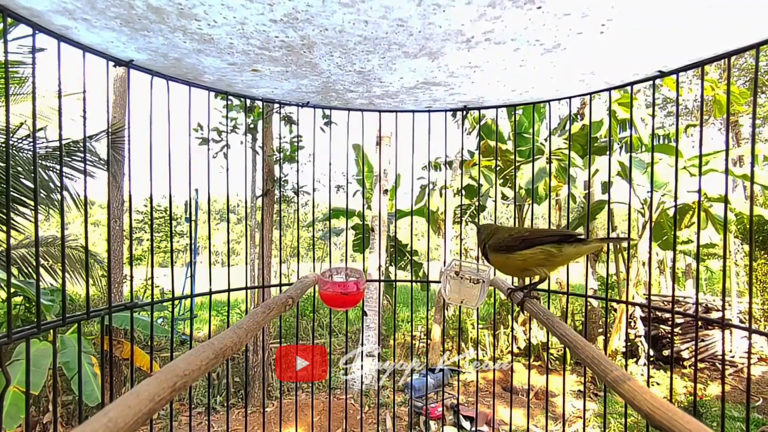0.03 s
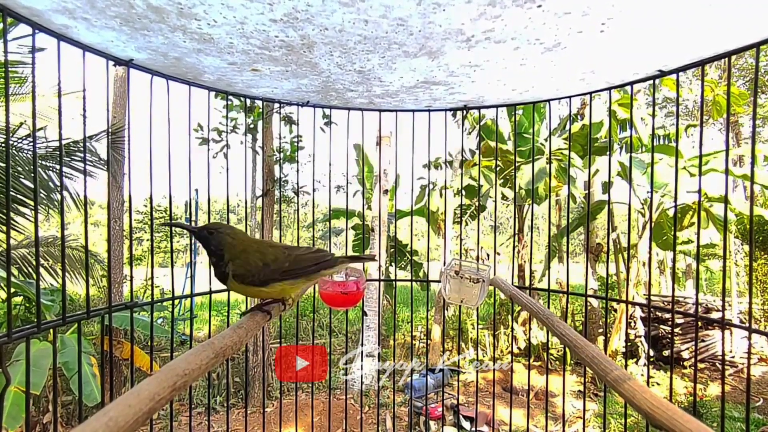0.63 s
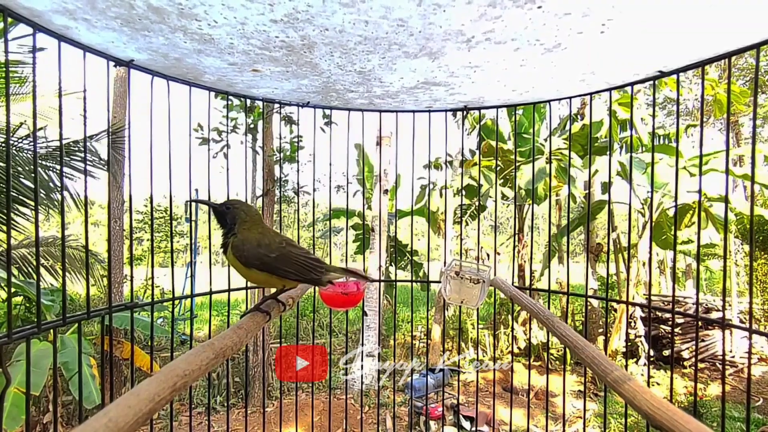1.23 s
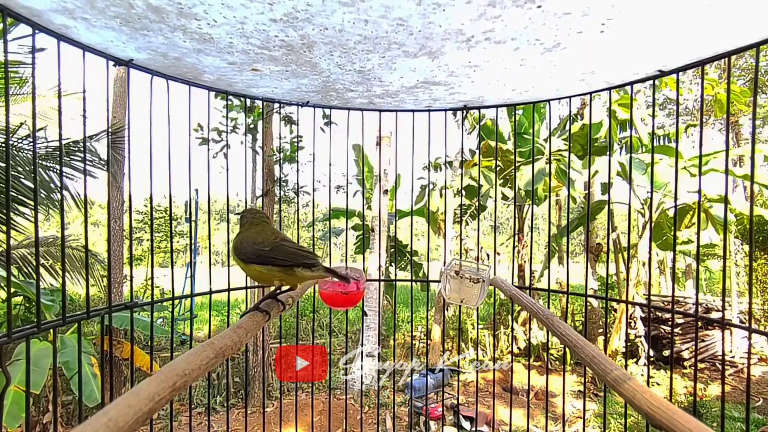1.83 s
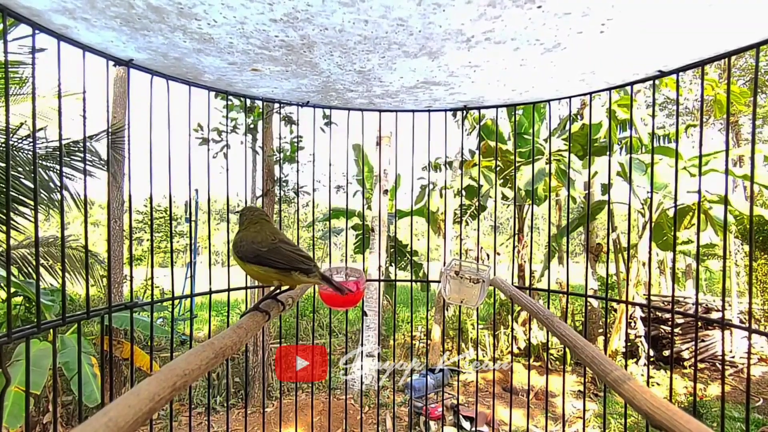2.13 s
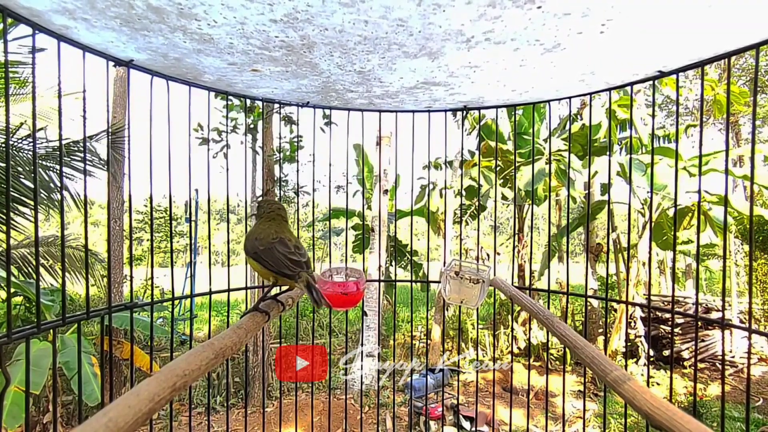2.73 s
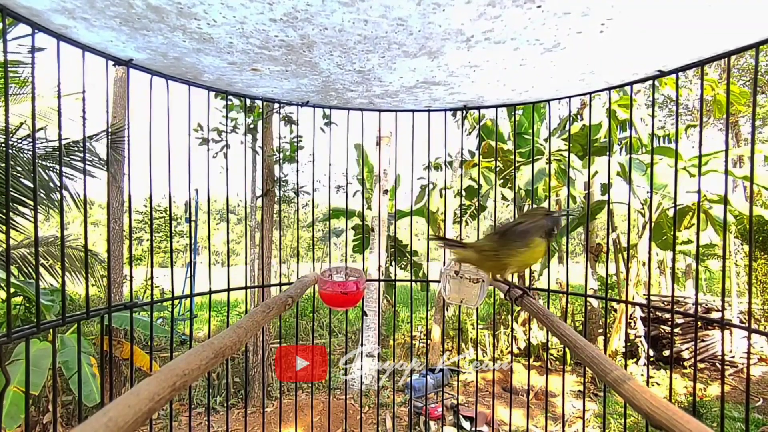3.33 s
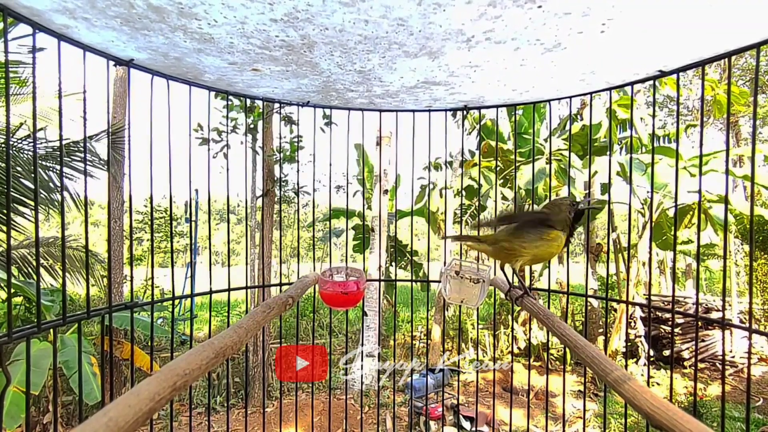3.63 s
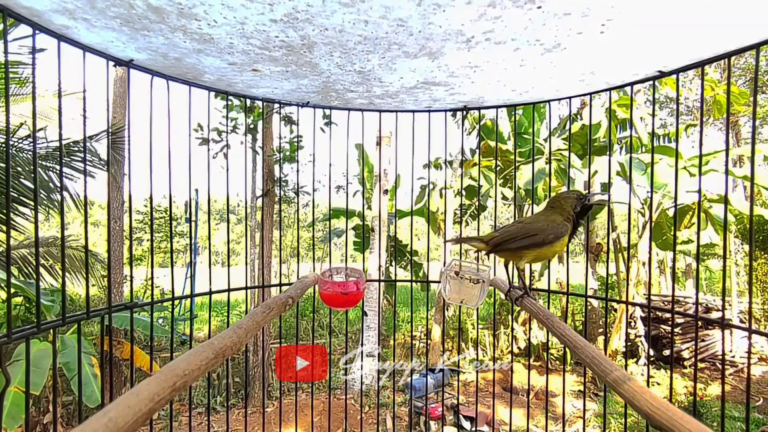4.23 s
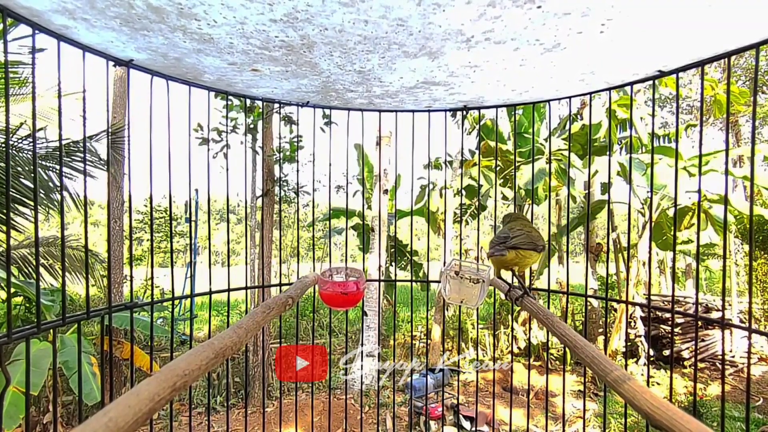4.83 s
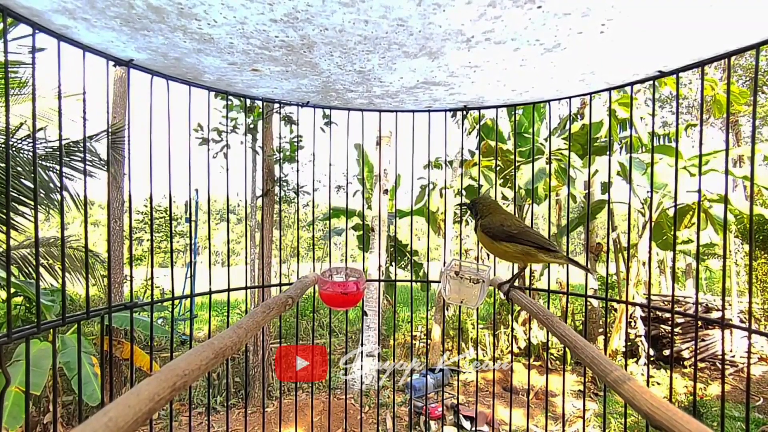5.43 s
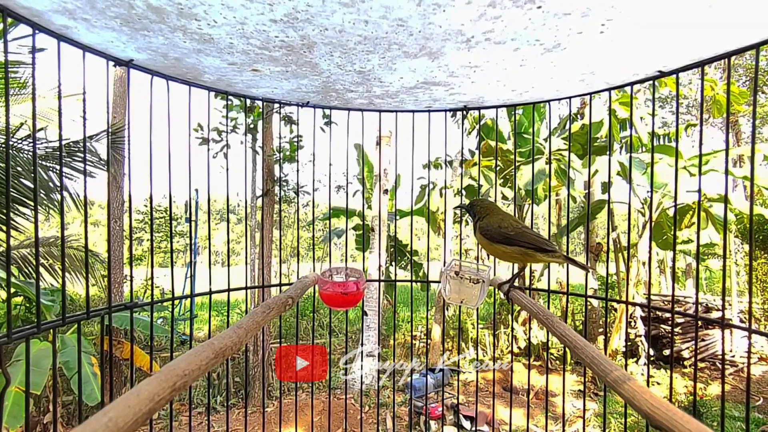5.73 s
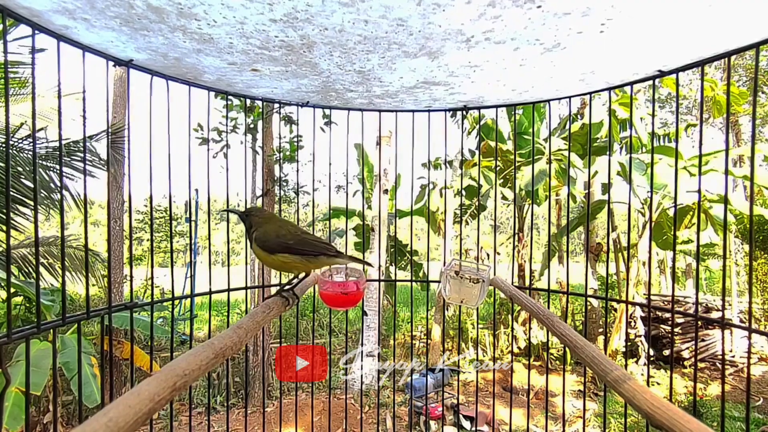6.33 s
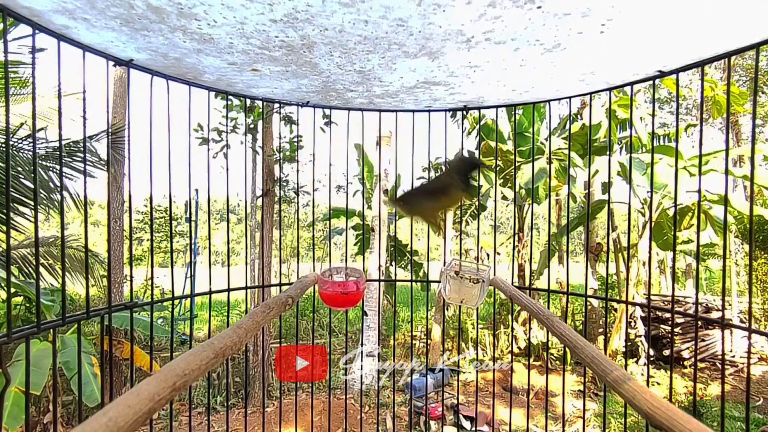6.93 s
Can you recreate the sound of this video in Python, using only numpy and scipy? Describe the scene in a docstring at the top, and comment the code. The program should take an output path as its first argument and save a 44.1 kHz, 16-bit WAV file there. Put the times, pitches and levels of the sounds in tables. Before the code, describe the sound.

A small caged bird calls loudly, close to the microphone, in a quiet garden. A sharp high chip comes at 0.2 seconds, with soft wing flutters and two light, ringing cage taps around 0.5. From 0.8 to 1.1 it holds one nasal note, hoarse at the edges. Two quick chips at 2.5 lead into nine arching notes from 2.7 to 4.3, about five a second, each climbing from a rasp into a whistle and closing nasally; the last is cut short. A faint flutter passes at 3.3. More soft flutters and taps come near 6.2 and 6.8, with a final sharp chip at 6.7 and a tap at 7. Another bird calls very faintly in the distance around 1.8, 5 and 6 seconds. Throughout, a far motor hums and throbs quietly beneath a thin insect whine and soft outdoor hiss.

```python
"""A garden, close to a caged sunbird: sharp chips, one long nasal note, then nine arched notes.
Membranes in its syrinx beat to make a harmonic series, which two throat resonances filter, so that
each arched note climbs out of a rasp into a clear whistle. As the bird hops between perches its wings
flutter and its feet set the cage ringing. Behind it a far motor hums and throbs, insects whine and
another bird calls faintly over a soft murmur."""
import sys
import numpy as np
from scipy import signal
from scipy.fft import rfft, irfft, next_fast_len
from scipy.io import wavfile
from scipy.ndimage import uniform_filter1d, minimum_filter1d, map_coordinates

SR = 44100
rng = np.random.default_rng(int(sys.argv[2]) if len(sys.argv) > 2 else 0)


def wav_out(sig):
    """Save sig, one row per channel (or a flat mono array), as 16-bit PCM at SR to the path in sys.argv[1]."""
    wavfile.write(sys.argv[1], SR, np.round(np.clip(np.atleast_2d(sig).T, -1, 1) * 32767).astype(np.int16))


N = 312228
TOP_HZ = 15900  # upper band limit

# Likeness of the garden's noise at the two ears. Each row: frequency in Hz, correlation from -1 to 1.
EAR_CORRELATION = [(60, 0.43), (130, 0.89), (290, 0.48), (640, -0.35), (1410, -0.11), (3100, -0.56),
                   (6820, 0.62), (15000, 0.19)]
# Pitch of the insect whine. Each row: time in seconds, pitch in Hz.
WHINE_PITCH = [(0, 3496), (.9, 3497), (1.55, 3471), (2.4, 3500), (4.5, 3503), (5.35, 3473), (6.25, 3505),
               (7.08, 3468)]
# Swells of the whine's fundamental. Each row: time in seconds, level in dB.
WHINE_SWELLS = [(0, -71), (.2, -59.5), (1.1, -69.5), (1.7, -73.5), (1.85, -77), (2.1, -67), (2.6, -61.5),
                (4.4, -64.5), (4.9, -64.5), (5.1, -72.5), (5.7, -69.5), (6.2, -61.5), (6.45, -67),
                (7.08, -69)]
# The whine's upper partials. Each row: harmonic number, level in dB.
WHINE_HARMONICS = [(2, -76.5), (3, -76), (4, -55)]
# Spectra of farther insects, outdoor murmur and hiss. Each row: frequency in Hz, relative level in dB.
CHORUS_SPECTRUM = [(4000, -43), (4550, -8), (4750, 5), (5000, -7.5), (5600, -42)]
MURMUR_SPECTRUM = [(25, -22.5), (50, -10.5), (110, -3), (180, -3), (400, -0.5), (600, -5), (830, -7.5),
                   (1100, -13), (1800, -19), (4000, -74.5)]
HISS_SPECTRUM = [(500, -33.5), (1000, -18.5), (1700, -6.5), (3000, -7.5), (5000, -10.5), (7400, -17),
                 (10000, -12.5), (11500, -15), (12600, -25.5), (14600, -27), (15400, -38.5)]
# Wing flutters. Each row: centre in seconds, length in seconds, level in dB.
WING_FLUTTERS = [(.17, .08, -50.5), (0.548, 0.0942, -51.5), (3.25, .1, -50), (6.175, 0.06, -57),
                 (6.774, 0.087, -52.5)]
# The sunbird's chips. Each row: start, swell, hold and fade in seconds, first and last pitch of the
# glide in Hz, level in dB, roughness from 0 to 1 at the peak and at the end, left-right balance in dB,
# left ear's lead in ms.
CHIP_CALLS = [(0.191, 0.027, .020, 0.0087, 5300, 6500, -13.5, 0.4, .05, -1.5, .005),
              (2.453, 0.024, 0.0089, .030, 5900, 6500, -14, .6, .85, -9.5, 0.25),
              (2.5, .038, .006, .018, 6300, 5700, -9.5, 0.3, .6, -3, .05),
              (6.666, .028, .017, .011, 5500, 6600, -12, .25, .08, -1.5, .03)]
# The hoarse, chaotic part of the voice. Each row: frequency in Hz, relative level in dB.
HOARSE_SPECTRUM = [(800, -48.5), (1400, -20), (2400, -25.5), (3700, -10.5), (5000, -6), (6500, 1),
                   (7700, -2.5), (8700, -5), (10200, -8), (15000, -21.5)]
# Feet and bill striking perch and bars. Each row: start in seconds, strength in dB.
CAGE_TAPS = [(0.418, -39.5), (0.535, -35), (6.152, -35), (6.777, -41), (6.985, -35)]
# Modes of the cage. Each row: frequency in Hz, relative level in dB, time to decay 60 dB in seconds.
CAGE_MODES = [(660, -3, .06), (1410, -2, .07), (1900, -7, .04), (2850, -8, .03)]
# The voice outside its two resonances. Each row: frequency in Hz, level in dB against the overtone gain.
OVERTONE_SPECTRUM = [(1000, 4), (2500, -17.5), (3300, -0.5), (4200, -12.5), (8000, 1), (10000, -0.5),
                     (12000, -6), (15500, -13)]
# Course of the long nasal note. Each row: time in seconds, pitch in Hz, levels of the lower and upper
# throat resonances in dB.
LONG_NOTE = [(0.794, 1566, -32.5, -46), (0.804, 1766, -33.5, -17.5), (0.818, 2160, -21, -17.5),
             (0.84, 2040, -28.5, -21.5), (0.852, 2190, -18.5, -17.5), (0.86, 2423, -11.5, -37),
             (0.87, 2416, -10, -48), (0.908, 2503, -12.5, -37.5), (0.932, 2380, -11, -39.5),
             (0.992, 2310, -27, -9), (1.006, 2250, -42, -9.5), (1.026, 2120, -38, -16.5),
             (1.06, 2133, -35.5, -9.5), (1.076, 1510, -25, -34.5)]
# Calls of a distant bird. Each row: start in seconds, frequency in Hz, level in dB.
FAR_BIRD_CALLS = [(1.832, 5770, -54.5), (4.959, 5960, -56), (5.961, 5850, -53.5), (6.03, 5470, -58)]
# Arched notes: a rasp, a whistle and a nasal close. Each row: start and length in seconds; whistle
# onset, crest and whistle end in seconds from the start; rasp, crest and close pitch in Hz; rasp,
# whistle and close level in dB; overtones against the voice in dB; rasp roughness from 0 to 1;
# left-right balance in dB; left ear's lead in ms.
ARCHED_NOTES = [(2.723, .153, .061, .095, 0.12, 2310, 2521, 2420, -10.5, -12.5, -14.5, -23.5, .28, -15.5, 0.059),
                (2.911, 0.16, 0.054, 0.12, .120, 2290, 2764, 2480, -10.5, -10.5, -11, -18, 0.3, -7.5, .135),
                (3.077, .155, 0.06, .102, .121, 2330, 2592, 2500, -11, -14.5, -14, -13.5, 0.5, -6.5, .14),
                (3.271, 0.17, 0.055, .099, 0.12, 2380, 2760, 2460, -14, -17, -13, -12.5, 0.7, -4, .52),
                (3.462, 0.17, 0.071, .110, .119, 2370, 2652, 2400, -15, -17, -14.5, -10.5, 0.8, -1.5, .52),
                (3.663, .158, .074, 0.11, .126, 2230, 2675, 2440, -13, -16.5, -11, -13.5, 0.3, -4, .53),
                (3.843, 0.18, .071, .114, .138, 2240, 2675, 2420, -15, -16, -16, -11, 0.7, -2, .53),
                (4.033, 0.2, 0.067, .120, 0.14, 2260, 2615, 2337, -13.5, -16, -16.5, -12, 0.7, -3.5, .53),
                (4.236, .109, .058, .084, 0.12, 2100, 2450, 2380, -15.5, -24, -35, -10, 0.7, -4.5, .55)]
# An antiresonance of the windpipe. Each row: frequency in Hz, gain in dB.
WINDPIPE_NOTCH = [(2700, 0), (3100, -9), (3600, -6), (4200, 0)]
# Reflections from the cage roof and nearby things. Each row: delay in ms, left gain, right gain.
REFLECTIONS = [(1.198, .05, 0.12), (2.7, .07, -.05)]
# The garden's reverberation. Each row: frequency in Hz, time to decay 60 dB in seconds.
GARDEN_DECAY = [(500, .25), (6000, .41), (14000, .18)]


def amp(db):
    """Decibels to amplitude ratio."""
    return 10 ** (np.asarray(db) / 20)


def unit(x):
    """Normalisation to rms 1."""
    return x / np.sqrt(np.mean(x ** 2) + 1e-20)


def ramp(x):
    """Saturation at 0 and 1."""
    return np.clip(x, 0, 1)


def along(points, hz):
    """Interpolation of (Hz, value) points on a logarithmic frequency axis."""
    f, v = np.transpose(points)
    return np.interp(np.log(hz + 1), np.log(f + 1), v)


def wobble(rate, size):
    """Smooth random modulation with rate knots a second."""
    knots = rng.standard_normal(int(size * rate / SR) + 4)
    return map_coordinates(knots, [np.arange(size) * rate / SR])


def filtered(x, response):
    """Linear filtering: the spectrum times a frequency response."""
    m = next_fast_len(N + SR // 2)
    return irfft(rfft(x, m) * response(np.fft.rfftfreq(m, 1 / SR)), m)[..., :N]


def phase_of(hz):
    """Phase in radians as the integral of frequency."""
    return 2 * np.pi * np.cumsum(hz) / SR


def panned(x, pan_db):
    """Interaural level difference at constant mean power; positive is to the left."""
    sides = amp(np.array([[.5], [-.5]]) * pan_db)
    return x * sides / np.sqrt(np.mean(sides ** 2, axis=0))


def leading(pair, lead_ms):
    """Interaural time difference: the left ear hears the sound lead_ms before the right."""
    size = pair.shape[-1]
    turn = np.pi * np.fft.rfftfreq(size, 1 / SR) * lead_ms / 1000
    return irfft(rfft(pair) * np.exp(1j * np.array([turn, -turn])), size)


def add(track, s, x):
    """Superposition of x on the track at s seconds."""
    part = track[..., max(round(s * SR), 0):][..., :x.shape[-1]]
    part += x[..., :part.shape[-1]]


def faded(x, seconds):
    """A linear taper at both ends."""
    t = np.arange(x.shape[-1]) / SR
    return x * ramp(np.minimum(t, t[-1] - t) / seconds)


def garden_noise(spectrum):
    """Partly coherent stereo noise of rms 1: the mid-to-side ratio sets the ears' correlation."""
    def response(hz):
        angle = np.arccos(np.clip(along(EAR_CORRELATION, hz), -1, 1)) / 2
        return amp(along(spectrum, hz)) * [np.cos(angle), np.sin(angle)]
    mid, side = filtered(rng.standard_normal((2, N)), response)
    return unit(np.array([mid + side, mid - side]))


def motor(hum_hz=83.8, hum_db=-55, throb_depth=.58):
    """Amplitude modulation: a far motor's hum throbs once every six cycles."""
    phase = phase_of(hum_hz * (1 + .002 * wobble(3, N)))
    level = amp(hum_db + .5 * wobble(4, N))
    hum = np.sin(phase + .3 * wobble(9, N))
    return level * unit(hum * (1 + throb_depth * np.sin(phase / 6)))


def insects(shimmer_db=3.34, drift=.0012, chorus_db=-69, pan_db=2, buzz_depth=.26, buzz_hz=330):
    """Fast strokes modulate a thin harmonic whine into a buzz, over a farther narrow-band chorus."""
    t = np.arange(N) / SR
    phase = phase_of(np.interp(t, *np.transpose(WHINE_PITCH)) * (1 + drift * wobble(48, N)))
    partials = [(1, np.interp(t, *np.transpose(WHINE_SWELLS)))] + WHINE_HARMONICS
    strokes = 1 + buzz_depth * np.sin(phase_of(buzz_hz * (1 + .14 * wobble(60, N))))
    whine = np.zeros((2, N))
    for ear in range(2):
        for k, db in partials:
            level = np.sqrt(2) * amp(db + shimmer_db * wobble(27, N))
            whine[ear] += level * np.sin(k * phase + .35 * wobble(54, N))
    sides = amp([[pan_db / 2], [-pan_db / 2]])
    return strokes * whine * sides + amp(chorus_db) * garden_noise(CHORUS_SPECTRUM)


def background(murmur_db=-51.5, hiss_db=-59):
    """Broadband ambient noise: a distant, gently wavering murmur under a soft hiss."""
    murmur = amp(murmur_db + .71 * wobble(3.6, N)) * garden_noise(MURMUR_SPECTRUM)
    return murmur + amp(hiss_db) * garden_noise(HISS_SPECTRUM)


def wing_flutters(beat_hz=28, beat_depth=.8):
    """Wingbeats modulate the amplitude of short swells of air noise."""
    t = np.arange(N) / SR
    swell = sum(amp(db) * np.exp(-(2 * (t - s) / length) ** 2) for s, length, db in WING_FLUTTERS)
    air = garden_noise([(60, -18), (180, 0), (600, -6.5), (2000, -16), (10000, -20), (15000, -40.5)])
    return swell * (1 + beat_depth * np.sin(2 * np.pi * beat_hz * t)) * air


def hoarse_noise(size):
    """Chaotic vibration of the voice: noise of rms 1, scattered differently to each ear."""
    colour = amp(along(HOARSE_SPECTRUM, np.fft.rfftfreq(size, 1 / SR)))
    return unit(irfft(rfft(rng.standard_normal((2, size))) * colour, size))


def chip_gesture(swell_s, hold_s, fade_s, first_hz, last_hz, peak_db, peak_rough, end_rough,
                 warble_hz=120, depth_hz=1400, depth_db=5, onset_db=-27, offset_db=-18, first_rough=.65):
    """Frequency and amplitude modulation: a chip's glide carries a fast swing that dies away."""
    length = swell_s + hold_s + fade_s
    t = np.arange(round(length * SR)) / SR
    swing = (1 - t / length) * np.cos(2 * np.pi * warble_hz * t)
    hz = first_hz + (last_hz - first_hz) * t / length + depth_hz * swing
    edges_db = onset_db * ramp(1 - t / swell_s) ** 2 + offset_db * ramp(1 - (length - t) / fade_s)
    rough = first_rough + (peak_rough - first_rough) * ramp(t / swell_s) ** 3
    rough += (end_rough - peak_rough) * ramp((t - swell_s) / (hold_s + fade_s))
    return hz, peak_db + edges_db + depth_db * swing, np.clip(rough, .03, .95)


def chip(hz, db, rough, jitter=.045, above_db=-14, below_db=-19):
    """Nonlinear vibration: roughness adds noise, a fifth above and both octaves to a whistle."""
    n = len(hz)
    phase = phase_of(hz * (1 + jitter * rough * wobble(2500, n)))
    above = amp(above_db) * (np.sin(2 * phase) + np.sin(1.5 * phase))
    below = amp(below_db) * np.sin(phase / 2)
    tone = np.sqrt(2) * (np.sin(phase) + rough * (above + below))
    noise_share = rough ** 1.5
    voice = np.sqrt(1 - noise_share ** 2) * tone + noise_share * hoarse_noise(n)
    return faded(amp(db) * voice, .0017)


def cage_taps(ring_db=-11, crack_db=-18, crack_t60=.05):
    """Impact excitation: each tap of foot or bill gives a crack and rings the cage's damped modes."""
    out, t = np.zeros((2, N)), np.arange(SR // 4) / SR
    for s, db in CAGE_TAPS:
        ring = sum(amp(level + rng.normal(0, 3) - 60 * t / t60) * np.sin(2 * np.pi * hz * t)
                   for hz, level, t60 in CAGE_MODES)
        crack = amp(crack_db - 60 * t / crack_t60) * rng.standard_normal((2, len(t)))
        add(out, s, amp(db) * (amp(ring_db) * ring + crack))
    return out


def resonance(hz, centre_hz, width_hz):
    """A band-pass response with a broad top and steep sides."""
    return 1 / np.sqrt(1 + (2 * (hz - centre_hz) / width_hz) ** 10)


def syrinx_note(controls, pan_db, jitter=.018, waver=.0088, wander=.007,
                flutter_db=2.7, scatter_db=4, beam_db=9):
    """Source and filter: harmonics of the syrinx pass through two throat resonances."""
    pitch, lower_gain, upper_gain, overtone_gain, rough = controls
    n = len(pitch)
    # at low tension the membranes beat unevenly
    rough = ramp(rough + .25 * ramp((2100 - pitch) / 400))
    detune = wander * wobble(80, n) + waver * wobble(320, n) + jitter * rough * wobble(1100, n)
    phase = phase_of(pitch * (1 + detune))
    # past a threshold the period doubles, putting lines halfway between the harmonics
    doubling = 1.5 * np.maximum(rough - .15, 0)
    beat = (1 + doubling * np.cos(phase / 2 + .8 * wobble(400, n))) / np.sqrt(1 + 2 * rough ** 2)
    effort = amp(flutter_db * wobble(170, n) + 2.3 * rough * wobble(320, n))
    # the throat follows the second and third harmonics, down to its widest opening
    tuning_hz = np.maximum(pitch, 2180)
    # the roughest moments break up into noise
    voice = .45 * rough ** 1.3 * np.hypot(lower_gain, upper_gain) * hoarse_noise(n)
    for k in range(1, 12):
        hz = k * pitch
        lower = lower_gain * resonance(hz, 2 * tuning_hz, width_hz=1600)
        upper = upper_gain * resonance(hz, 3 * tuning_hz, width_hz=2700)
        rest = overtone_gain * amp(along(OVERTONE_SPECTRUM, hz))
        power = (lower ** 2 + upper ** 2 + rest ** 2) * np.minimum(pitch / 2300, 1)
        gain = np.sqrt(2 * power) * (hz < TOP_HZ)
        # the fundamental and the top lie further left than the throat's band
        outside = 1 - resonance(hz, centre_hz=6200, width_hz=5000)
        sides = panned(gain * effort * (beat if k > 1 else 1), pan_db + beam_db * outside)
        start_phase = rng.uniform(0, 2 * np.pi)
        for ear in range(2):
            # as the head moves, the cage shifts each partial's strength and phase
            scatter = amp(scatter_db * outside * wobble(70, n))
            blur = (.3 + .5 * outside) * wobble(35, n) + .6 * rough * wobble(900, n)
            voice[ear] += sides[ear] * scatter * np.sin(k * phase + start_phase + blur)
    return faded(voice, .00043)


def long_gesture(overtone_db=-24.5, tense_rough=.026, hoarse_hz=2299, rough_per_khz=1.2):
    """Slack membranes vibrate irregularly: the long note turns hoarse wherever its pitch sinks."""
    times, *columns = np.transpose(LONG_NOTE)
    t = np.arange(times[0], times[-1], 1 / SR)
    pitch, lower_db, upper_db = [np.interp(t, times, column) for column in columns]
    lower, upper = amp(lower_db), amp(upper_db)
    overtones = amp(overtone_db) * (upper + amp(-3) * lower)
    rough = np.clip(tense_rough + rough_per_khz * np.maximum(hoarse_hz - pitch, 0) / 1000, 0, .35)
    return pitch, lower, upper, overtones, rough


def far_bird(smear_hz=600, t60=.89, attack_s=.0031):
    """Scattering by trees smears each short call into a decaying narrow band of noise."""
    out, t = np.zeros((2, N)), np.arange(SR // 2) / SR
    n = len(t)
    for s, hz, db in FAR_BIRD_CALLS:
        smear = np.array([wobble(smear_hz, n) * np.sin(2 * np.pi * hz * t + wobble(smear_hz, n))
                          for ear in range(2)])
        add(out, s, unit(smear) * amp(db - 60 * t / t60) * (1 - np.exp(-t / attack_s)))
    return out


def arched_gesture(length, clear_s, crest_s, close_s, rasp_hz, crest_hz, close_hz,
                   rasp_db, whistle_db, close_db, overtone_db, rasp_rough):
    """Membrane tension sets pitch and air pressure sets level through a rasp, a whistle and a close."""
    slack_hz, climb_s, end_hz, fall_s = 1157, .03, 1820, .015
    onset_db, attack_s, offset_db, release_s = -26, .031, -18, .024
    sag_db_per_s, crest_db_per_s, idle_db = 190, 79, -29
    lower_switch_s, upper_switch_s = .0069, .0046  # the lower resonance comes and goes more slowly
    close_rough, broken_rough = .14, .9
    t = np.arange(round(length * SR)) / SR
    after = lambda s, width: (1 + np.tanh((t - s) / width)) / 2
    # the pitch climbs from slack membranes, arches from just before the whistle and falls back
    arch_start, fall_start = clear_s - .014, length - fall_s
    up = np.sin(np.pi / 2 * ramp((t - arch_start) / (crest_s - arch_start))) ** 2
    down = 1 - (1 - ramp((t - crest_s) / max(fall_start - crest_s, upper_switch_s))) ** 1.9
    climb, fall = ramp(t / climb_s), ramp((t - fall_start) / fall_s)
    arch_hz = (crest_hz - rasp_hz) * up + (close_hz - crest_hz) * down
    pitch = slack_hz + (rasp_hz - slack_hz) * climb + arch_hz + (end_hz - close_hz) * fall
    # shares of the three voices
    rasp, close = 1 - after(clear_s, upper_switch_s), after(close_s, upper_switch_s)
    whistle = after(clear_s, lower_switch_s) * (1 - after(close_s + lower_switch_s, lower_switch_s))
    broken = ramp((t - length + .028) / fall_s)  # the voice breaks just before the end
    pressure = amp(onset_db * ramp(1 - t / attack_s) ** 1.6)
    pressure *= amp(offset_db * ramp(1 - (length - t) / release_s) ** 2)
    nasal = rasp * amp(rasp_db - sag_db_per_s * np.maximum(t - climb_s, 0))
    nasal += close * amp(close_db - 2 * broken)
    clear = whistle * amp(whistle_db - crest_db_per_s * np.abs(t - crest_s))
    lower = pressure * (clear + amp(idle_db) * (1 - whistle))
    upper = pressure * (nasal + amp(idle_db) * clear)
    # overtones follow the pressure less steeply and are weaker in the whistle
    overtones = pressure ** .69 * amp(overtone_db) * (nasal + amp(-3) * clear)
    # the rasp roughens as the membranes tighten; a soft whistle turns ragged
    whistle_rough = .052 + .05 * max(-15 - whistle_db, 0)
    rough = rasp * rasp_rough * climb + (1 - rasp - close) * whistle_rough
    rough += close * (close_rough + (broken_rough - close_rough) * broken)
    return pitch, lower, upper, overtones, rough


def sunbird():
    """Directional radiation: each call comes from where the head points, notched by the windpipe."""
    song = np.zeros((2, N))
    add(song, LONG_NOTE[0][0], leading(syrinx_note(long_gesture(), pan_db=-11), lead_ms=.048))
    for s, *shape, pan_db, lead_ms in ARCHED_NOTES:
        add(song, s, leading(syrinx_note(arched_gesture(*shape), pan_db), lead_ms))
    for s, *shape, pan_db, lead_ms in CHIP_CALLS:
        add(song, s, leading(panned(chip(*chip_gesture(*shape)), pan_db), lead_ms))
    return filtered(song, lambda hz: amp(along(WINDPIPE_NOTCH, hz)))


def echoes(x, wet_db=-26):
    """Early reflections from near surfaces, then the garden's faint, exponentially decaying tail."""
    near = filtered(x, lambda hz: sum(np.array([[left], [right]]) * np.exp(-2j * np.pi * hz * ms / 1000)
                                      for ms, left, right in REFLECTIONS))
    hz, t, noise = signal.stft(rng.standard_normal((2, SR // 2)), SR, nperseg=256)
    decay = amp(-60 * t / along(GARDEN_DECAY, hz)[:, None])
    tail = signal.istft(noise * decay, SR, nperseg=256)[1]
    return near + amp(wet_db) * signal.fftconvolve(x, tail / np.linalg.norm(tail[0]), axes=1)[:, :N]


def scene():
    """Superposition of the caged bird, its echoes and the garden around it."""
    cage = sunbird() + cage_taps() + wing_flutters()
    return cage + echoes(cage) + far_bird() + motor() + insects() + background()


def record(dry, ceiling=.86):
    """Peak limiting eases the gain on the highest peaks; a low-pass filter then limits the band."""
    needed = np.minimum(1, ceiling / (np.abs(dry).max(axis=0) + 1e-9))
    gain = uniform_filter1d(minimum_filter1d(needed, size=256), size=256)
    return filtered(dry * gain, lambda hz: hz < TOP_HZ)


dry = scene()
out = record(dry)
wav_out(out)
```